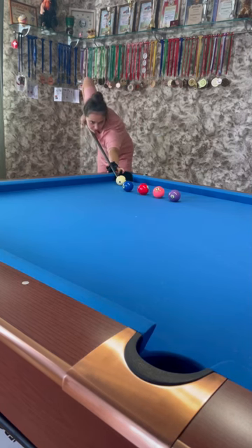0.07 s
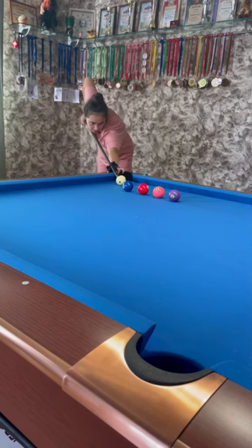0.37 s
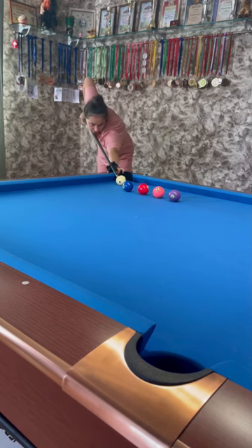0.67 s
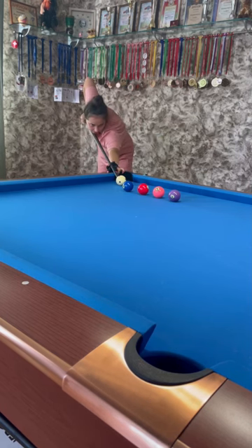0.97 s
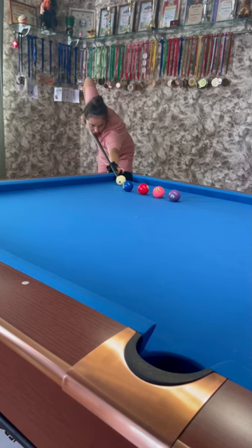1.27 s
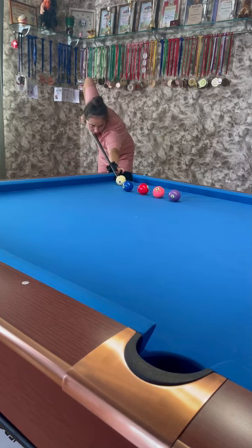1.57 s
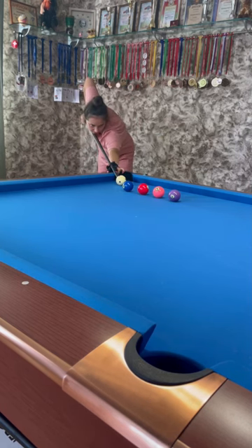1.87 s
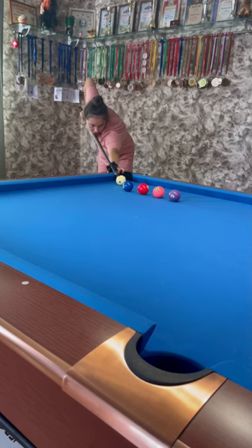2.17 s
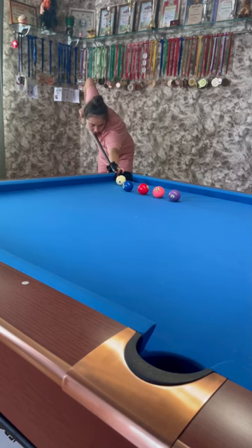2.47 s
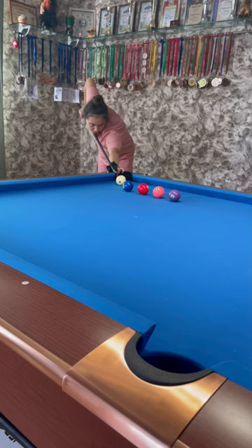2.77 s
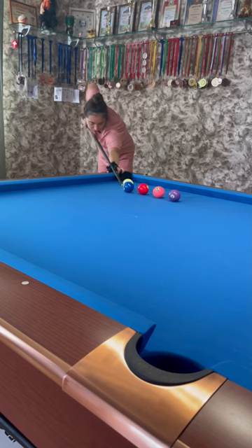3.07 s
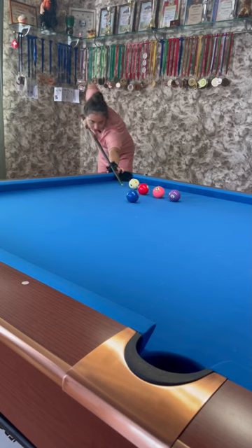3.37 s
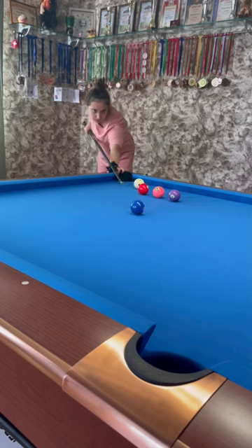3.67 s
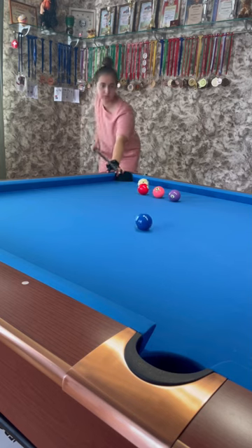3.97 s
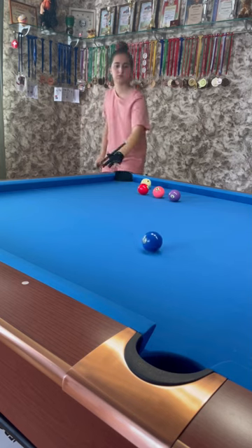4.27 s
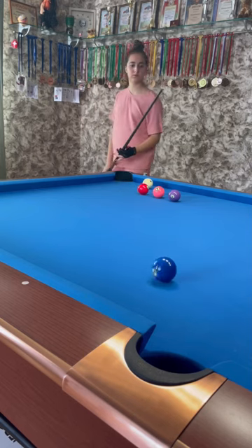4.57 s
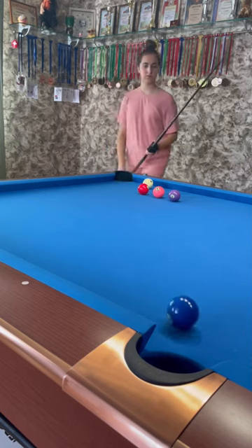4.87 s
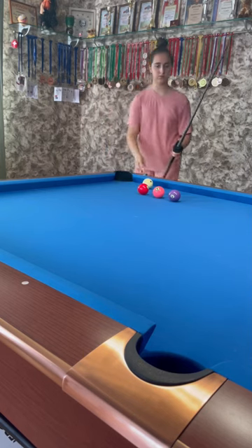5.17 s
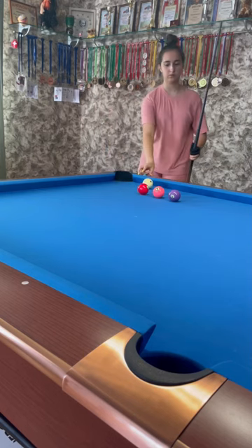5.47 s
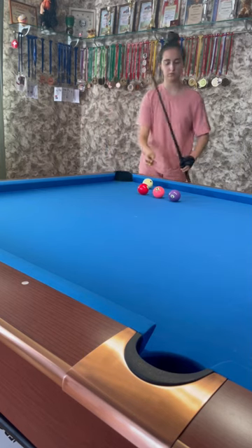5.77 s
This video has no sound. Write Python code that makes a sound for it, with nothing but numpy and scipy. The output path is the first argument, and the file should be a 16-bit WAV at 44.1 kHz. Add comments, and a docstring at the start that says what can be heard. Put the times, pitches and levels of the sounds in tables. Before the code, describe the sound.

In a quiet, hard-walled room, a couple of faint taps come from the far end of a pool table. A cue gives a dull knock, followed at once by the sharp click of ball on ball. Soft woody knocks follow while the ball rolls faintly closer. It drops into the pocket beside the microphone with a loud crack and clunk, then rattles away down the chute.

```python
"""A quiet, hard-walled room with a pool table, heard from beside the corner pocket. Soft swishes come and go,
then the cue knocks the white ball, which clicks against an object ball; the table shudders, and soft knocks
come from the far end before and after. The ball rumbles closer over the cloth and, two seconds on, tips into
the near pocket, where it cracks, clunks, sets the wooden frame ringing and rattles away down the chute. A low
hush lies under it all."""
import sys
import numpy as np
from scipy import signal
from scipy.fft import rfft, irfft, next_fast_len
from scipy.io import wavfile
from scipy.ndimage import uniform_filter1d

SR = 44100
rng = np.random.default_rng(int(sys.argv[2]) if len(sys.argv) > 2 else 0)


def file_out(sig):
    """Save sig as 16-bit WAV at sys.argv[1]."""
    # one column per channel
    cols = np.atleast_2d(sig).T
    # limit, then scale
    lim = np.clip(cols, -1, 1)
    pcm = np.round(lim * 32767).astype(np.int16)
    wavfile.write(sys.argv[1], SR, pcm)


N = 256220

CUE_S, CLICK_S, LIP_S = 2.9568, 3.0607, 5.131  # tip on ball, ball on ball, ball on the pocket's lip
TABLE_LAG_S = .0098  # the heavy table answers this long after a contact

# Colour of the room's hush: freq_hz, level_db
HUSH_EQ = [(12, -41.5), (20, -10.5), (38, -6.5), (58, 0), (74, -10), (96, -3.5), (168, -6.5), (198, -4),
           (780, -20), (1330, -26), (3160, -45.5), (6180, -49), (10200, -60), (12400, -54), (16000, -69)]
# Soft swishes now and then, each a brush and a sheen: # start_s, hold_s, brush_db, sheen_db, fade_db_per_s,
# brush_cutoff_hz
SWISHES = [(2.03, .24, -95, -86, 110, 12000), (2.8, .14, -92, -84, 200, 12000),
           (4.0, .14, -76, -80, 29, 12000), (4.42, .09, -68, -79, 65, 9500),
           (4.58, .17, -83, -95, 90, 9500), (5.0, .085, -68, -105, 85, 5500)]
# Smooth brush of a swish: freq_hz, level_db
BRUSH_EQ = [(800, -25), (2800, -6), (4200, -1), (5800, 0), (8000, -5), (10300, -18), (12500, -8),
            (15500, -22)]
# Thin sheen on top of the brush: freq_hz, level_db
SHEEN_EQ = [(2000, -30), (6000, -15), (8500, -9), (11000, -2), (12700, 0), (14200, -11), (15500, -16)]
# Soft knocks of cue and balls at the far end; harder means more clack and less thud:
# start_s, tap_db, hardness_db, bed_hum_db, room_send_db
FAR_KNOCKS = [(2.3412, -38.5, 6, -47, -2.5), (2.5895, -45.5, 3, -56, -4), (3.684, -32.5, -4, -50, -1),
              (3.781, -46.5, -1, -57, 0), (3.862, -40.5, -11, -57, -1), (4.134, -52, 7, -64, -1)]
# Woody tap: freq_hz, level_db
TAP_EQ = [(100, -18), (500, -2.5), (750, 9), (1100, 7.5), (1500, -3), (2400, -15), (3300, -26), (4500, -34),
          (9000, -45), (15000, -49)]
# Ring of the cue's wood under a hard tap: pitch_hz, level_db, t60_s
CUE_WOOD_MODES = [(1160, -25, .03), (1750, -28, .025), (1880, -29, .025), (2180, -26, .03),
                  (2400, -31, .025)]
# Low thud of the table: freq_hz, level_db
THUD_EQ = [(40, -20), (110, -5), (250, -3), (360, 3), (440, 2.5), (540, -12), (900, -25), (2000, -51.5),
           (6000, -74.5)]
# Hum of the table's bed: pitch_hz, level_db, t60_s
BED_MODES = [(68, -8, .6), (105, 0, .7), (123, -4, .8), (142, -1, .8), (198, -5, .6), (234.9, -2, .5),
             (285.5, -1, .4), (315, 0, 0.36)]
# Leather tip on the white ball: freq_hz, level_db
TIP_EQ = [(50, -38), (140, -13), (260, -8), (400, -3), (560, -2.5), (730, 0), (1000, -7), (1500, -20),
          (2100, -25), (2650, -24), (3400, -39), (5000, -43), (9000, -44), (14000, -47)]
# Ring of the shaft after the stroke: pitch_hz, level_db, t60_s
SHAFT_MODES = [(390, -18.5, .22), (522, -25, .18), (727, -16.5, .17), (910, -20.5, .1), (1631, -41, .18),
               (2143, -37, .22), (2471, -39, .17), (2676, -34, .14)]
# Ball against ball: freq_hz, level_db
CLICK_EQ = [(40, -50), (90, -32), (160, -17), (330, -14), (600, -19), (1000, -9.5), (1500, -4),
            (2400, -0.5), (3000, -5.5), (3500, -12), (3950, -25), (4400, -42), (5800, -35), (8000, -45),
            (10300, -63), (13000, -35), (15500, -37.5)]
# Rumble of a rolling ball: freq_hz, level_db
RUMBLE_EQ = [(25, -26), (46, -8), (70, 0), (105, -2.5), (150, -8), (200, -26.5), (400, -21.5), (1000, -56)]
# The player's dull scuff: freq_hz, level_db
SCUFF_EQ = [(150, -15), (450, -2), (700, 0), (1100, -6), (1800, -22), (4000, -40)]
# The ball grinding over the lip: freq_hz, level_db
GRIND_EQ = [(40, -22), (110, -10), (188, 1), (240, -5), (320, 3), (410, 3), (540, -16), (730, -18),
            (1200, -30), (2000, -54), (6000, -76)]
# The ball's main hits in the pocket and chute: start_s, crack_db, knock_db, clunk_db
POCKET_HITS = [(5.2519, -2.5, -10, -16), (5.2548, -20, -16, -5), (5.2675, -2.5, -11, -13),
               (5.2816, -30, -26, -8), (5.2955, -30, -21, -16), (5.302, -28, -28, -10.5),
               (5.309, -34, -24, -12.5), (5.3255, -26, -22, -17), (5.343, -35, -30, -18),
               (5.3585, -12, -19, -26), (5.3675, -32, -22, -24), (5.3815, -13, -17, -19),
               (5.394, -34, -28, -20), (5.434, -36, -34, -23), (5.468, -19.5, -30, -34),
               (5.5008, -21, -22, -32), (5.5075, -22, -18, -27), (5.519, -24, -22, -17),
               (5.545, -31, -25, -22), (5.556, -32, -24, -22), (5.572, -40, -34, -21),
               (5.648, -48, -42, -30), (5.72, -50, -44, -33)]
# Hard crack on the liner: freq_hz, level_db
CRACK_EQ = [(60, -32), (200, -16), (500, -9), (800, -2), (1150, 0.5), (1400, -2), (1900, 0.5), (2500, 1.5),
            (3050, -4), (3600, -14), (4500, -26), (5800, -20.5), (8000, -32), (10200, -43), (12500, -33),
            (15500, -30)]
# Hollow knock on the chute: freq_hz, level_db
CHUTE_KNOCK_EQ = [(100, -30), (450, -10), (720, -2), (950, 0), (1200, -3), (1450, -12), (2200, -19),
                  (3500, -32), (6000, -55)]
# Dull clunk on the frame: freq_hz, level_db
CLUNK_EQ = [(35, -50), (65, -19), (120, -22), (200, -6), (320, -3.5), (430, 2), (530, 1.5), (610, -7),
            (900, -11), (1500, -29), (4000, -72)]
# Ring of the pocket and its wooden frame: pitch_hz, level_db, t60_s
FRAME_MODES = [(67, -28, .5), (104.5, -33, .5), (139.5, -34, .7), (164, -33, .5), (196, -21, .4),
               (246, -29, .35), (285, -24.5, .28), (316, -25, .25), (367, -24, .2), (435, -19, .31),
               (457, -19, .25), (537, -21, .3), (637, -26, .2), (763, -27, .16), (916, -27, .14),
               (1021, -34, .18), (1095, -32, .18), (1145, -32.5, .18), (1585, -31, .14), (1866, -27.5, .13),
               (1912, -24, .09), (2310, -30, .09), (2365, -33, .18), (2417, -24, .24), (2540, -32, .08),
               (2800, -33, .18), (2926, -33.5, .26), (3050, -37, .24)]
# Decay of reflections inside the pocket: freq_hz, t60_s
CAVITY_DECAY = [(100, 0.063), (500, .06), (2500, .045), (12000, .06)]
# One small bump in the chute: freq_hz, level_db
CHATTER_EQ = [(60, -16.5), (150, 3), (230, -3), (330, 0), (460, 2), (620, -8), (1150, -8), (1500, -21),
              (2000, -22), (2800, -18), (3800, -28), (4600, -37), (6500, -38), (10000, -64), (13000, -40),
              (16000, -48)]
# Bright ticks in the rattle: start_s, level_db
RATTLE_TICKS = [(5.26, -25), (5.3255, -30), (5.3605, -26), (5.4925, -31), (5.6635, -36)]
# Colour of one tick: freq_hz, level_db
TICK_EQ = [(2000, -25), (5000, -9), (8000, -9), (10200, -14), (13000, 0), (15500, -2)]
# Decay of the room's reverb: freq_hz, t60_s
ROOM_DECAY = [(60, .7), (250, .92), (600, 0.75), (1000, .75), (1500, 0.83), (2700, 0.9), (4000, 0.8),
              (8000, .6), (14000, .42)]
# Early reflections off cloth, rails and wall: delay_s, left_db, right_db
EARLY_ECHOES = [(.0007, -16.5, -12.5), (.002, -13.5, -17.5), (.0036, -17.5, -28.5), (.0057, -5.5, -32),
                (0.0248, -22.5, -23), (.044, -22.5, -21)]
# How alike diffuse sound is on left and right: freq_hz, correlation
STEREO_LIKENESS = [(60, 0.99), (200, .94), (380, .75), (700, -0.1), (1300, 0.19), (2400, 0.28),
                   (4400, 0.23), (8000, -.3), (10200, -.85), (12500, 0), (15000, 0)]
# Colour difference between the microphones: freq_hz, left_minus_right_db
MIC_BALANCE = [(60, -0.7), (200, 1.9), (400, 3.5), (700, 4), (1200, -2), (2400, .8), (4500, -0.6),
               (15000, 0.3)]


def amp(db):
    """Decibels to gain."""
    return 10 ** (np.asarray(db) / 20)


def unit_rms(x):
    """Scales to rms 1."""
    return x / np.sqrt(np.mean(x ** 2) + 1e-20)


def curve(points, hz):
    """Joins (freq_hz, value) points on a log-frequency axis."""
    freq_hz, value = np.transpose(points)
    return np.interp(np.log(hz + 1), np.log(freq_hz), value)


def add(mix, start_s, sound):
    """Mixes a sound in at start_s."""
    part = mix[..., round(start_s * SR):][..., :sound.shape[-1]]
    part += sound[..., :part.shape[-1]]


def convolve(x, response):
    """Passes a mono or stereo sound through a mono or stereo response."""
    return signal.fftconvolve(np.atleast_2d(x), np.atleast_2d(response), axes=1)[:, :N]


def shade(x, hz):
    """A gentle low-pass: treble does not bend around an obstacle."""
    return signal.lfilter(*signal.butter(1, min(hz, SR / 3), fs=SR), x)


def pulse(eq, size=8192):
    """The tightest transient with this spectrum (minimum phase), peak 1."""
    log_gain = np.log(amp(curve(eq, abs(np.fft.fftfreq(size, 1 / SR)))))
    spectrum = np.exp(np.conj(signal.hilbert(log_gain)))
    wave = np.fft.ifft(spectrum).real[:size // 2]
    return wave / abs(wave).max()


def noise(eq):
    """Steady noise of this colour, rms 1."""
    return unit_rms(convolve(rng.standard_normal(N), pulse(eq)))


def ring(modes, size=SR, rise_cycles=.8):
    """A struck body's ring: a sum of dying sines, each taking a cycle or two to bloom."""
    hz, db, t60 = np.transpose(modes)[:, :, None]
    t = np.arange(size) / SR
    attack = 1 - np.exp(-hz * t / rise_cycles)
    return (attack * amp(db - 60 * t / t60) * np.sin(2 * np.pi * hz * t)).sum(0)


def hits(times_s, levels_db, sound):
    """Triggers one sound at each time and level."""
    track = np.zeros(sound.shape[:-1] + (N,))
    for start_s, gain in zip(times_s, amp(levels_db)):
        add(track, start_s, gain * sound)
    return track


def swell(start_s, rise_s, hold_s, fade_db_per_s):
    """An envelope that rises, holds until hold_s after its start, then dies away."""
    t = np.arange(N) / SR - start_s
    return np.clip(t / rise_s, 0, 1) * amp(-fade_db_per_s * np.maximum(t - hold_s, 0))


def diffuse(pair):
    """Sound from all sides: nearly mono in the bass, wide in the treble."""
    size = pair.shape[1]
    a, b = rfft(pair)
    likeness = np.clip(curve(STEREO_LIKENESS, np.fft.rfftfreq(size, 1 / SR)), -1, 1)
    mid, side = a * np.sqrt((1 + likeness) / 2), b * np.sqrt((1 - likeness) / 2)
    return irfft(np.array([mid + side, mid - side]), size)


def tail(decay, build_s, build_cycles, size):
    """Dense reflections: the bass builds more slowly, and each band dies at its own speed."""
    reflections = diffuse(rng.choice([-1., 1.], (2, size)))
    hz, t, bands = signal.stft(reflections, SR, nperseg=256)
    growth = 1 - np.exp(-np.outer(hz, t + build_s) / build_cycles)
    fade = amp(-60 * t / curve(decay, hz)[:, None])
    wave = signal.istft(bands * growth * fade, SR, nperseg=256)[1]
    wave *= 1 - np.exp(-np.arange(wave.shape[1]) / SR / build_s)
    return wave / np.sqrt(np.sum(wave ** 2) / 2)


def room(x):
    """The reverb that one spot in the room sends to the microphones."""
    return convolve(x, tail(ROOM_DECAY, build_s=.003, build_cycles=3.5, size=SR))


def across_table(x, low_cut_hz=130):
    """Sound crosses the table thinned in the bass, first straight, then off the nearest surfaces."""
    paths = np.zeros((2, SR // 10))
    paths[:, 0] = 1
    for delay_s, left_db, right_db in EARLY_ECHOES:
        add(paths, delay_s, amp([[left_db], [right_db]]))
    return convolve(x - shade(x, low_cut_hz), paths)


def on_table(x, room_db, shade_hz=2200):
    """Places a contact on the table: dulled on its way across the cloth, drawn out by the room."""
    return across_table(shade(x, shade_hz)) + amp(room_db) * room(x)


def room_hush(level_db=-56, waver_db=-.64):
    """The low, faintly wavering hush of the room."""
    size = next_fast_len(N, real=True)
    white = diffuse(rng.standard_normal((2, size)))
    colour = amp(curve(HUSH_EQ, np.fft.rfftfreq(size, 1 / SR)))
    hush = irfft(rfft(white) * colour, size)[:, :N]
    drift = unit_rms(uniform_filter1d(uniform_filter1d(rng.standard_normal(N), size=6000), size=4000))
    return amp(level_db + waver_db * drift) * unit_rms(hush)


def swishes(rise_s=.07, grain_db=.5, brush_extra_fade_db_per_s=14):
    """Soft swishes: a smooth brush that dies first, and a thin sheen that lingers."""
    brush, sheen_gain = np.zeros((2, N)), np.zeros(N)
    rub = unit_rms(convolve(rng.standard_normal((2, N)), pulse(BRUSH_EQ)))
    for start_s, hold_s, brush_db, sheen_db, fade, cutoff_hz in SWISHES:
        soft_rub = shade(shade(rub, cutoff_hz), cutoff_hz)
        brush += amp(brush_db) * swell(start_s, rise_s, hold_s, fade + brush_extra_fade_db_per_s) * soft_rub
        sheen_gain += amp(sheen_db) * swell(start_s, rise_s, hold_s, fade)
    grain = unit_rms(uniform_filter1d(rng.standard_normal(N), size=800))
    sheen = unit_rms(convolve(diffuse(rng.standard_normal((2, N))), pulse(SHEEN_EQ)))
    return amp(grain_db * grain) * (brush + sheen_gain * sheen)


def far_knocks(thud_db=-2, clack_db=-12):
    """Woody taps with a trace of ball clack; the table answers each with a thud and hums on."""
    start_s, tap_db, hardness_db, bed_db, room_db = np.transpose(FAR_KNOCKS)

    def contact(level_db):
        """Tap, clack and the brief ring of the cue's wood."""
        tap = hits(start_s, level_db, pulse(TAP_EQ))
        clack = hits(start_s, level_db + clack_db + hardness_db, pulse(CLICK_EQ))
        wood = hits(start_s, level_db + hardness_db, ring(CUE_WOOD_MODES))
        return tap + shade(clack, hz=3500) + wood

    answer_s = start_s + TABLE_LAG_S
    thuds = hits(answer_s, tap_db + room_db + thud_db - hardness_db / 2, pulse(THUD_EQ))
    hum = hits(answer_s, bed_db, ring(BED_MODES))
    direct = across_table(shade(contact(tap_db) + thuds, hz=3000))
    return direct + room(contact(tap_db + room_db) + thuds) + hum


def cue_strike(level_db=-13.5):
    """The soft tip gives one dull pulse and sets the shaft ringing."""
    strike = ring(SHAFT_MODES)
    add(strike, 0, pulse(TIP_EQ))
    return on_table(hits([CUE_S], [level_db], strike), room_db=2, shade_hz=1000)


def table_shudder(count=6, gap_s=.029, widening_s=.0103):
    """Low thuds follow the stroke at widening gaps, dying away, and leave the bed humming."""
    thud_db, thud_fade_db_per_s = -26, 50
    hum_db, hum_fade_db_per_s = -39.5, 14
    k = np.arange(count)
    age_s = k * gap_s + k * (k - 1) / 2 * widening_s
    start_s = CUE_S + TABLE_LAG_S + age_s
    thuds = hits(start_s, thud_db - thud_fade_db_per_s * age_s, pulse(THUD_EQ))
    hum = hits(start_s, hum_db - hum_fade_db_per_s * age_s, ring(BED_MODES))
    return on_table(thuds, room_db=.8) + hum


def ball_click(level_db=-1):
    """Two hard balls touch for a fraction of a millisecond and do not ring."""
    return on_table(hits([CLICK_S], [level_db], pulse(CLICK_EQ)), room_db=-6.3, shade_hz=8000)


def ball_roll(far_m=2.4, near_m=.14, level_at_1m_db=-63):
    """The ball rumbles over the cloth to the pocket's lip at an even speed, louder as it nears."""
    distance_m = np.interp(np.arange(N) / SR, [CLICK_S, LIP_S], [far_m, near_m])
    envelope = swell(CLICK_S, rise_s=.05, hold_s=LIP_S - CLICK_S, fade_db_per_s=150)
    return amp(level_at_1m_db) / distance_m * envelope * noise(RUMBLE_EQ)


def player_scuff(level_db=-63):
    """A soft, dull scuff, all reverb, as the player straightens up at the far end."""
    envelope = swell(start_s=4.39, rise_s=.03, hold_s=.06, fade_db_per_s=200)
    return room(amp(level_db) * envelope * noise(SCUFF_EQ))


def pocket_lip(thud_db=-30, tap_db=-47, grind_db=-38.5):
    """The ball bumps on to the lip of the pocket and grinds dully over the edge."""
    bump = hits([LIP_S], [thud_db], pulse(THUD_EQ)) + hits([LIP_S], [tap_db], pulse(TAP_EQ))
    grind = amp(grind_db) * swell(LIP_S, rise_s=.006, hold_s=.03, fade_db_per_s=115) * noise(GRIND_EQ)
    return on_table(bump + grind, room_db=-5)


def through_wood(wave, travel_at_1khz_s=.0022, low_hz=350, top_hz=3600, lead_s=.0004):
    """Bending waves carry the treble first, so a sharp pulse arrives as a quick downward sweep."""
    hz = np.fft.rfftfreq(len(wave), 1 / SR)
    slowness = np.sqrt(1000 / np.clip(hz, low_hz, top_hz))
    delay_s = lead_s + travel_at_1khz_s * (slowness - slowness[-1])
    phase = 2 * np.pi * np.cumsum(delay_s) * hz[1]
    swept = irfft(rfft(wave) * np.exp(-1j * phase), len(wave)) * np.linspace(1, 0, len(wave))
    return swept / abs(swept).max()


def pocket_drop(direct_db=.3, cavity_db=-2.8, room_db=-5.8, ring_room_db=-9.5):
    """The ball cracks on the hard liner, knocks on the chute, clunks on the frame and sets it ringing."""
    crack_to_ring_db, clunk_to_ring_db, ring_top_hz = -4.5, -3.5, 3600
    spread_db, detune = 2, .005
    crack, knock, clunk = through_wood(pulse(CRACK_EQ)), pulse(CHUTE_KNOCK_EQ), pulse(CLUNK_EQ)
    times_s, crack_db, knock_db, clunk_db = np.transpose(POCKET_HITS)
    hz, db, t60 = np.transpose(FRAME_MODES)
    contact = hits(times_s, crack_db, crack) + hits(times_s, knock_db, knock)
    contact += hits(times_s, clunk_db, clunk)
    drives = amp(crack_db + crack_to_ring_db) + amp(clunk_db + clunk_to_ring_db)
    ringing, hollow = np.zeros(N), np.zeros((2, N))
    for start_s, crack_gain, knock_gain, drive in zip(times_s, amp(crack_db), amp(knock_db), drives):
        # each hit lands elsewhere: it bends and favours other modes and gets its own quick reflections
        bend, favour = rng.standard_normal((2, len(FRAME_MODES)))
        modes = np.transpose([hz * (1 + detune * bend), db + spread_db * favour, t60])
        add(ringing, start_s, drive * ring(modes, size=SR // 2))
        cavity = tail(CAVITY_DECAY, build_s=.0004, build_cycles=1.5, size=4096)
        add(hollow, start_s, amp(cavity_db) * convolve(crack_gain * crack + knock_gain * knock, cavity))
    ringing = signal.sosfilt(signal.butter(4, ring_top_hz, fs=SR, output="sos"), ringing)
    direct = amp(direct_db) * shade(contact, hz=3000)  # the rim hides the contact
    reverb = room(amp(room_db) * contact + amp(ring_room_db) * ringing)
    return direct + ringing + hollow + reverb


def chute_run(bumps_per_s=500, spread_db=2, chatter_db=-37, rumble_db=-42.5, room_db=-1):
    """Small bumps in the chute make the ball chatter; the table's rumble lingers as it rolls away."""
    fall_s, rise_s, hold_s = POCKET_HITS[0][0], .06, .28
    sizes = amp(spread_db * np.minimum(rng.exponential(1, N), 3)) * rng.choice([-1, 1], N)
    triggers = rng.random(N) < bumps_per_s / SR
    bumps = unit_rms(convolve(sizes * triggers, pulse(CHATTER_EQ)))
    chatter = amp(chatter_db) * swell(fall_s, rise_s, hold_s, fade_db_per_s=95) * bumps
    rumble = amp(rumble_db) * swell(fall_s, rise_s, hold_s, fade_db_per_s=24) * noise(RUMBLE_EQ)
    return rumble + chatter + amp(room_db) * room(chatter)


def rattle_ticks():
    """A few thin, bright ticks stand out of the rattle."""
    start_s, level_db = np.transpose(RATTLE_TICKS)
    return on_table(hits(start_s, level_db, pulse(TICK_EQ)), room_db=2, shade_hz=9000)


def scene():
    """The room, the shot, and the ball's run into the pocket."""
    lead_in = room_hush() + swishes() + far_knocks()
    shot = cue_strike() + table_shudder() + ball_click() + ball_roll() + player_scuff()
    sinking = pocket_lip() + pocket_drop() + chute_run() + rattle_ticks()
    return lead_in + shot + sinking


def record(dry, low_cut_hz=40, high_cut_hz=15700):
    """The two microphones differ a little in colour and lose the deepest bass and the very top."""
    size = next_fast_len(N + SR, real=True)
    balance_db = curve(MIC_BALANCE, np.fft.rfftfreq(size, 1 / SR))
    colour = amp(np.array([balance_db, -balance_db]) / 2)
    heard = irfft(rfft(dry, size) * colour, size)[:, :N]
    heard = signal.sosfilt(signal.butter(6, low_cut_hz, "highpass", fs=SR, output="sos"), heard)
    high_cut = signal.firwin(511, high_cut_hz, window=("kaiser", 9), fs=SR)
    return signal.oaconvolve(heard, high_cut[None], "same")


dry = scene()
out = record(dry)
file_out(out)
```